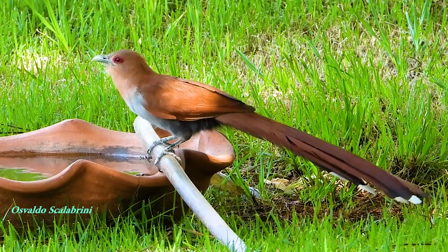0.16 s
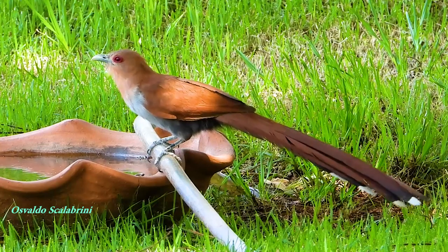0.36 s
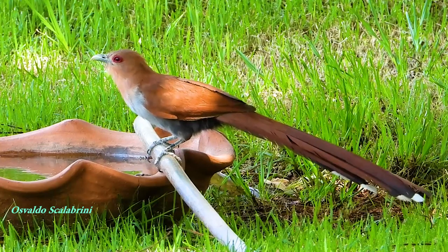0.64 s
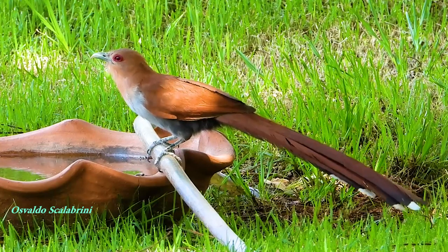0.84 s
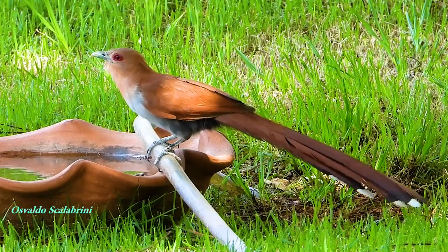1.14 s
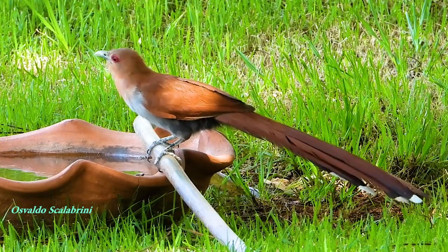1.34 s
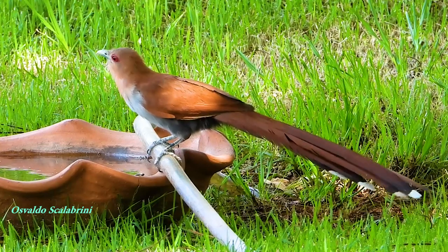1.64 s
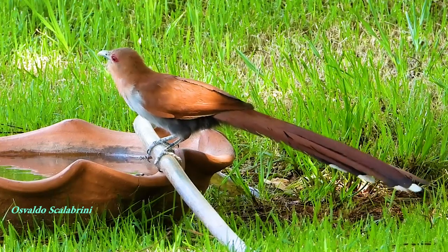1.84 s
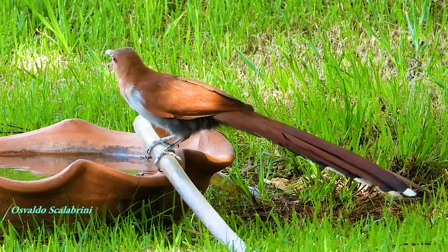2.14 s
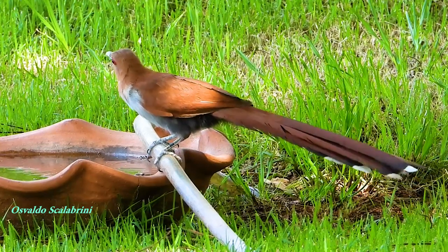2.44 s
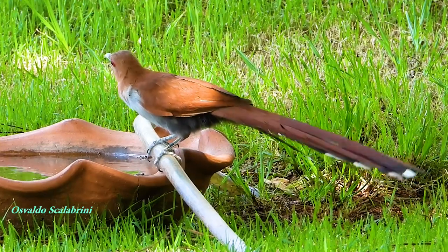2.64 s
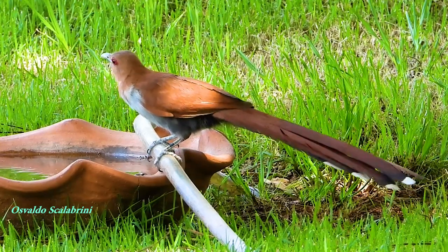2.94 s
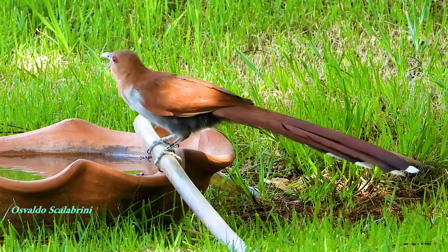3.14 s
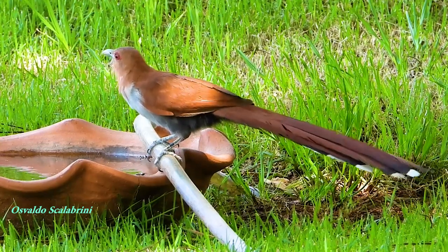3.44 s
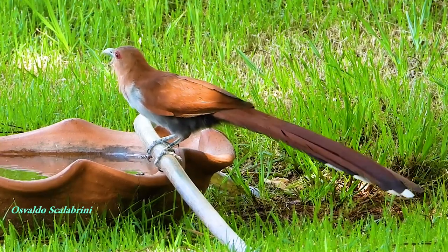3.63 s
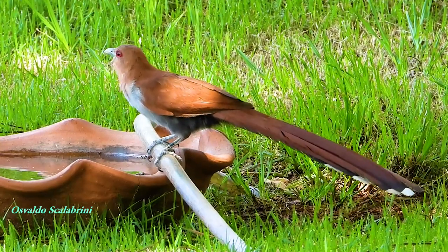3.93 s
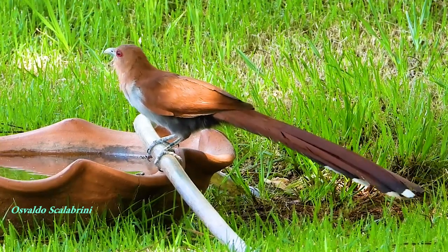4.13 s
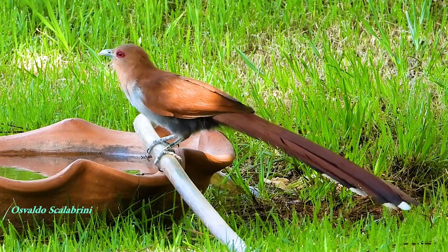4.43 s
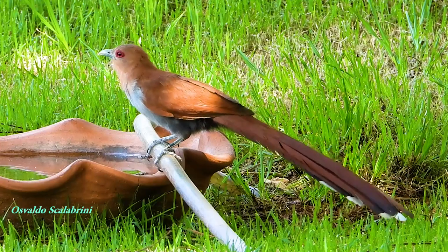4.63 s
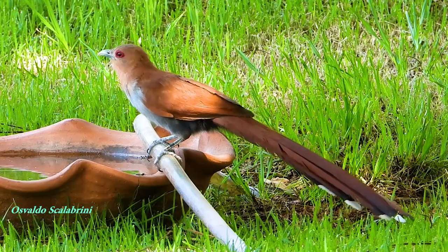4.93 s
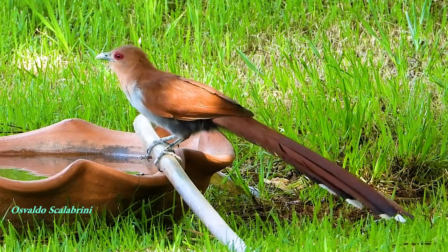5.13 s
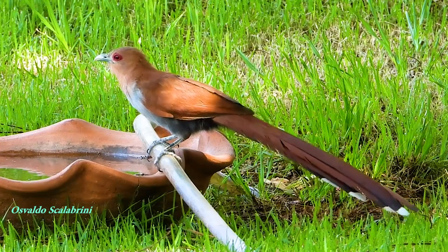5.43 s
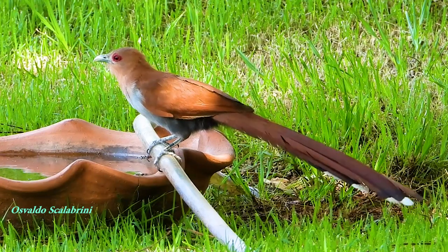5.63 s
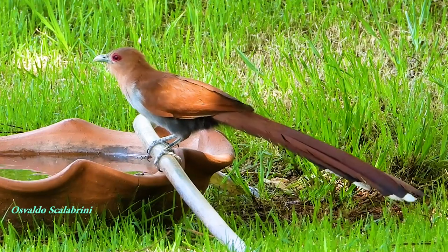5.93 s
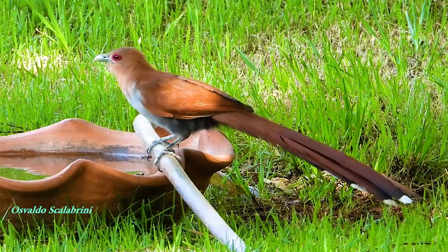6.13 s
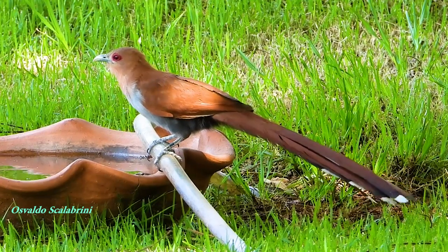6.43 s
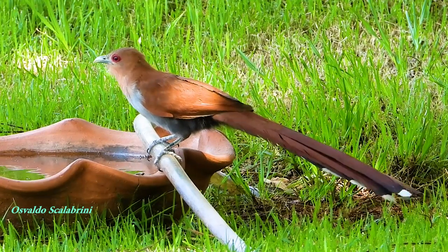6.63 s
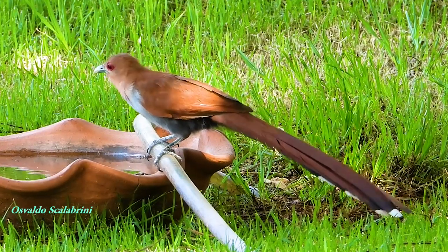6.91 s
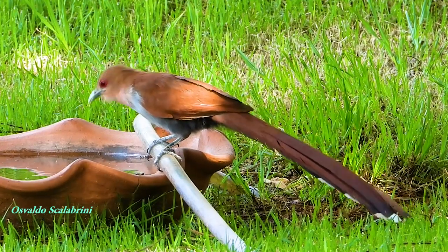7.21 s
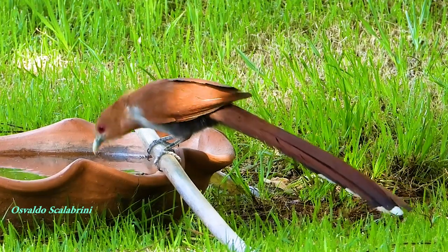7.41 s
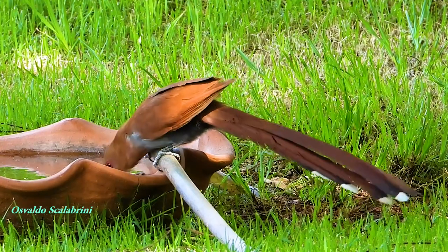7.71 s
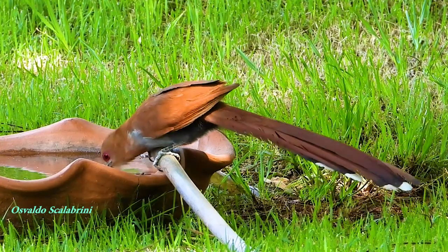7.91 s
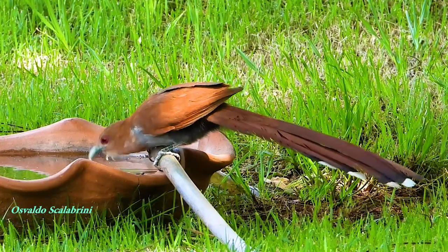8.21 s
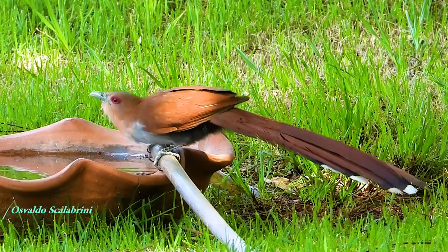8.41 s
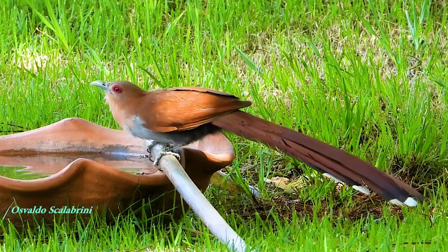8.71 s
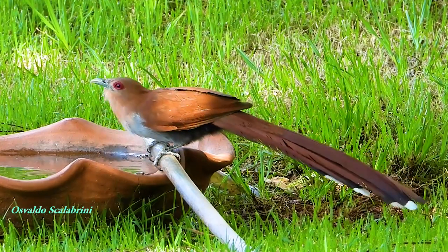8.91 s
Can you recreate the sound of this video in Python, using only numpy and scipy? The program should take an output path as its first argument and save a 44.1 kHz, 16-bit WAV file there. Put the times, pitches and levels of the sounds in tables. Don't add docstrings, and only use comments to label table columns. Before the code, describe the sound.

Garden birds call in short, bright whistled phrases, with chips, chatter, a trill and harsh churrs over faint insect ringing and a thin high whine.

```python
import sys
import numpy as np
from scipy import signal
from scipy.io import wavfile
from scipy.ndimage import uniform_filter1d

SR = 44100
rng = np.random.default_rng(int(sys.argv[2]) if len(sys.argv) > 2 else 0)


def generate_wav(sig):
    pcm = np.round(np.clip(np.atleast_2d(sig).T, -1, 1) * 32767).astype(np.int16)
    wavfile.write(sys.argv[1], SR, pcm)


def boost_factor(decibels):
    exponent = np.asarray(decibels, float) / 20
    return 10 ** exponent


N = 399546
T = np.arange(N) / SR


def evened(x):
    return x / np.sqrt(np.mean(x ** 2) + 1e-20)


def smooth_noise(count, size):
    return uniform_filter1d(rng.standard_normal(count), size=size)


def high_pass(x, order, cutoff_hz):
    return signal.sosfilt(signal.butter(order, cutoff_hz, "high", fs=SR, output="sos"), x)


def read(points, hz):
    f, value = np.transpose(points)
    return np.interp(np.log(hz + 1), np.log(f + 1), value)


def add(mix, s, sound):
    at = round(s * SR)
    part = mix[max(at, 0):max(at + len(sound), 0)]
    part += sound[max(-at, 0):][:len(part)]


# (f/Hz, level/dB)
FLAT = [(1000, 0), (16000, 0)]


def sing(hz, db, overtones_db, edge, beak=FLAT, rough=0):
    count = len(hz)
    hz = hz * (1 + 0.024 * smooth_noise(count, 60))
    phase = 2 * np.pi * np.cumsum(hz) / SR
    wave = np.sin(phase) * (1 + 0.085 * rough * evened(smooth_noise(count, 90)))
    for k, over_db in enumerate(overtones_db, start=2):
        flutter = 1 + rough * evened(smooth_noise(count, 36))
        passed = boost_factor(over_db + read(beak, k * hz) - read(beak, hz))
        passed = passed * (k * hz < SR / 2)
        wave = wave + passed * flutter * np.sin(k * phase)
    return np.sqrt(2) * boost_factor(db) * wave * signal.windows.tukey(count, np.clip(edge, 0, 1))


def glide(mix, rows, overtones_db, edge=0.11, beak=FLAT, size=180):
    s, hz, db = np.transpose(rows)
    t = np.arange(s[0], s[-1], 1 / SR)
    hz = uniform_filter1d(np.interp(t, s, hz), size=size, mode="nearest")
    db = uniform_filter1d(np.interp(t, s, db), size=size, mode="nearest")
    add(mix, s[0], sing(hz, db, overtones_db, edge, beak, rough=0.3))


def chirps(rows, bend, fade_db, overtones_db, edge, rough, beak=FLAT):
    mix = np.zeros(N)
    for s, length, start_hz, end_hz, db in rows:
        u = np.linspace(0, 1, int(length * SR))
        hz = start_hz + (end_hz - start_hz) * u ** bend
        add(mix, s, sing(hz, db + fade_db * u, overtones_db, edge, beak, rough))
    return mix


# (f/Hz, left-right likeness/1)
SAME = [(100, 0.69), (700, 0.14), (1500, 0.11), (4000, 0.49), (8000, 0.94)]


def noise(spectrum, patchy_db):
    frames, hz = N // 128 + 5, np.fft.rfftfreq(512, 1 / SR)
    a, b, c, d, patches = rng.standard_normal((frames, 257, 5)).T
    patches = uniform_filter1d(patches, size=6, axis=0)
    patches = evened(uniform_filter1d(patches, size=20, axis=1))
    same = np.clip(read(SAME, hz), -1, 1)[:, None]
    left = a + 1j * b
    right = same * left + np.sqrt(1 - same ** 2) * (c + 1j * d)
    z = np.array([left, right]) * boost_factor(read(spectrum, hz)[:, None] + patchy_db * patches)
    return evened(signal.istft(z, nperseg=512, noverlap=384)[1][:, :N])


# (f/Hz, t60/s)
TREES = [(1000, 0.26), (2200, .5), (3000, 0.49), (4500, 0.47), (7000, 0.45), (12000, 0.31)]


def placed(x, pan_db, echoes, wet_db, gap_s, apart=0.37, low_hz=1100):
    taps = np.zeros((3, SR))
    at = np.arange(0, SR, 20) + rng.integers(0, 20, (3, SR // 20))
    np.put_along_axis(taps, at, rng.choice([-1., 1.], at.shape), 1)
    taps = taps[0] + apart * taps[1:]
    _, t, z = signal.stft(taps, SR, nperseg=256)
    t60 = np.maximum(read(TREES, np.fft.rfftfreq(256, 1 / SR)), .05)
    tail = signal.istft(z * boost_factor(-60 * t / t60[:, None]), SR, nperseg=256)[1]
    tail *= 1 - np.exp(-np.arange(tail.shape[1]) / (0.58 * gap_s * SR))
    tail = boost_factor(wet_db) * tail / np.linalg.norm(tail[0])
    path = np.pad(tail, ((0, 0), (int(gap_s * SR) + 1, 0)))
    path[:, 0] = 1
    for s, db in echoes:
        path[:, int(s * SR)] += boost_factor(db)
    x = high_pass(x, 4, low_hz)
    heard = signal.fftconvolve(x[None], path, axes=1)[:, :N]
    return heard * boost_factor(np.array([[pan_db], [-pan_db]]) / 2)


# (f/Hz, level/dB)
AIR = [(35, -72), (60, -35.5), (553, -33), (1410, -10), (2770, -6.5), (3190, -2), (3510, -8), (5590, -10),
       (6290, -11), (6750, -9.5), (7410, -12.5), (14300, -15.5), (16000, -8)]


def air():
    return boost_factor(-69.5) * noise(AIR, 1.0)


def whine():
    return boost_factor(-78.5) * np.sin(2 * np.pi * 15734 * T)


def from_perch(x):
    return placed(x, -1.8, [(.013, -18), (.045, -27.5)], -16, 0.003, apart=1.0)


# (top t/s, start f/Hz, top f/Hz, level/dB, f/Hz at which the ground echo cancels)
RISES = [
    (.018, 2412, 2871, -38, 2834),
    (.318, 2380, 2897, -38, 2672),
    (.607, 2364, 3000, -37, 2870),
    (.908, 2350, 2955, -37.5, 2863),
    (2.6, 2570, 3055, -34.5, 2900),
    (2.91, 2435, 3017, -33, 2874),
    (3.181, 2346, 2933, -35.5, 2844),
    (3.465, 2126, 3099, -32, 2807),
    (3.776, 2150, 3126, -32.5, 2870),
    (4.066, 2150, 3050, -33, 2760),
]
# (dip t/s, dip f/Hz, arch f/Hz, arch level/dB, arch length t/s)
HOOKS = [
    (0.043, 1620, 2308, -42.5, .068),
    (.35, 1600, 2317, -41.5, 0.069),
    (0.633, 1694, 2386, -42, 0.07),
    (.941, 1650, 2276, -42.5, 0.077),
    (2.634, 1750, 2436, -37.5, 0.069),
    (2.935, 1682, 2400, -38.5, 0.075),
    (3.21, 1600, 2350, -37.5, 0.072),
    (3.494, 1878, 2505, -36, 0.076),
    (3.804, 1822, 2385, -39.5, 0.072),
    (4.099, 1982, 2392, -40, 0.069),
]
# (f/Hz, level/dB)
BEAK = [(1500, -30), (2000, -16), (2400, 2.5), (3000, -6), (3700, 3), (4800, -9), (6000, -1), (9000, -0.5),
        (14000, -0.5)]
RISE_S = .058
MIDWAY_DB, MIDWAY_DB_PER_KHZ = 13.5, -20.5
DIP_DB, DIP_DB_PER_KHZ = -67, 38.5


def whistles():
    mix = np.zeros(N)
    for rise, hook in zip(RISES, HOOKS):
        s, start_hz, top_hz, top_db, null_hz = rise
        dip, dip_hz, arch_hz, arch_db, arch_s = hook
        end = dip + arch_s
        mid_db = top_db + MIDWAY_DB + MIDWAY_DB_PER_KHZ * (top_hz - start_hz) / 1000
        dip_db = DIP_DB + DIP_DB_PER_KHZ * (dip_hz - 1700) / 1000
        rows = [(s - RISE_S, start_hz, mid_db - 20.5),
                (s - .76 * RISE_S, .18 * start_hz + .71 * top_hz, mid_db - 9),
                (s - 0.48 * RISE_S, .12 * start_hz + .82 * top_hz, mid_db),
                (s, top_hz, top_db),
                (s + 0.0055, .96 * top_hz, top_db + 3.0),
                (s + .017, 1.12 * dip_hz, dip_db + 11.5),
                (dip, dip_hz, dip_db),
                (dip + 0.009, 1.1 * dip_hz, dip_db + 11.5),
                (dip + .018, .95 * arch_hz, arch_db - 3),
                (dip + .52 * arch_s, 1.01 * arch_hz, arch_db),
                (end - .013, .97 * arch_hz, arch_db - 6.5),
                (end, 0.83 * arch_hz, arch_db - 18.5)]
        call = np.zeros(N)
        rows = np.add(rows, [.1, 0, -3])
        glide(call, rows, [-31, -35.5, -39.0, -42.5, -39.5], edge=0.02, beak=BEAK)
        ground_delay = round(SR * 13.5 / null_hz)
        add(mix, -.1, call + boost_factor(-1.5) * np.roll(call, ground_delay))
    return from_perch(mix)


# (t/s, lead over a steady beat/pulses, level/dB)
CRICKET = [(0, -.42, -66.5), (.9, -.45, -70), (1.8, -.17, -67), (2.2, -.22, -74), (2.45, -.8, -70.5),
           (3.3, -.67, -67.5), (4.5, -.78, -67), (5.2, -.87, -71.5), (5.33, -1.7, -72),
           (5.45, -1.56, -69.5), (5.8, -1.22, -70.5), (6.72, -1.2, -67), (7.15, -.85, -68),
           (7.7, -.75, -68), (8.6, -.68, -68), (9.1, -.73, -69.5)]
# (from t/s, to t/s)
RESTS = [
    (2.3, 2.375),
    (5.215, 5.32),
    (6.73, 6.895),
]
BEAT_HZ, REST_DB = 22.1, -15


def cricket():
    s, lead, db = np.transpose(CRICKET)
    beat = BEAT_HZ * T + np.interp(T, s, lead)
    u = ((beat + .5) % 1 - .5) / 0.46
    stroke = np.sqrt(np.clip(2.7 * (.5 - abs(u)), 0, 1))
    wander_hz = 14 * evened(smooth_noise(N, 1500))
    hz = 3290 + wander_hz - 70 * np.clip(u, -.5, .5)
    tone = sing(hz, np.interp(T, s, db) - 0.5, [], 0) * stroke
    tone *= boost_factor(REST_DB * sum((T > a) & (T < b) for a, b in RESTS))
    far = sing(6900 + wander_hz, -90.5, [], 0) * stroke[::-1]
    return placed(tone, 8, [], -14, .01) + far


# (start t/s, length t/s, level/dB)
TWITTERS = [
    (0.025, 0.11, -74),
    (0.481, 0.13, -84),
    (0.841, 0.1, -73),
    (3.098, 0.11, -72.5),
    (4.073, 0.11, -73.5),
    (4.867, 0.071, -73.5),
    (7.221, 0.12, -75),
    (8.57, 0.11, -75),
]


def twitter():
    mix = np.zeros(N)
    for s, length, db in TWITTERS:
        u = np.arange(int(length * SR)) / SR / .058 % 1
        falling = sing(5760 - 180 * u, db, [], 0.1)
        dipping = sing(5300 + 260 * (2 * u - 1) ** 2, db, [], 0.31)
        add(mix, s, falling + dipping)
    flutter = 1 + 0.49 * evened(smooth_noise(N, 150))
    return placed(mix * flutter, -0.83, [], -7.5, 0.0027)


def from_twig(x):
    return placed(x, -0.22, [(.0035, -8.5), (.009, -11)], -17.5, 0.0081)


# (lowest point t/s, f/Hz, level/dB)
CHIPS = [
    (.66, 5505, -44),
    (4.952, 5526, -42),
    (8.012, 5340, -49),
]
# (t/s, pitch ratio/1, level/dB)
CHIP_SHAPE = [
    (-.009, 1.2, -20),
    (0, 1, -0.5),
    (.0085, 1.06, -4.5),
    (.0165, 1.1, -18.5),
]


def chips():
    mix = np.zeros(N)
    for s, hz, db in CHIPS:
        glide(mix, np.multiply(CHIP_SHAPE, [1, hz, 1]) + [s, 0, db], [-24], size=90)
    return from_twig(mix)


# (t/s, length t/s, start f/Hz, end f/Hz, level/dB)
SONG = [(1.154, .018, 4290, 3660, -71), (1.2, 0.032, 4700, 5400, -75.5), (1.401, 0.025, 4700, 5400, -67),
        (1.468, 0.03, 4350, 2750, -56.5), (1.497, 0.057, 2794, 4560, -57), (1.552, 0.018, 4450, 3480, -56),
        (1.568, 0.035, 3600, 2503, -60), (1.597, 0.017, 2550, 2790, -63.5), (1.682, .025, 5890, 6210, -60),
        (1.712, .011, 5180, 7200, -66), (1.72, 0.044, 7160, 6300, -61.5), (1.81, 0.052, 4750, 3180, -54),
        (1.995, 0.037, 4600, 4360, -68)]
# (t/s, length t/s, start f/Hz, end f/Hz, level/dB)
PLUNGES = [
    (1.243, 0.081, 4405, 2540, -63.5),
    (1.432, 0.034, 5560, 4190, -61),
    (1.612, .02, 2834, 2300, -64),
    (1.765, 0.046, 6370, 4570, -57),
    (1.911, 0.034, 5020, 4290, -59),
]
# (t/s, length t/s, start f/Hz, end f/Hz, level/dB)
ZIGZAGS = [(2.305, 0.016, 6730, 5880, -71), (2.409, 0.011, 5050, 3140, -69.5),
           (2.422, .013, 3365, 5580, -66.5), (2.435, .012, 5770, 3610, -66.5),
           (2.415, .013, 6730, 5840, -69.5), (4.205, .045, 4700, 3400, -73),
           (6.782, .012, 7303, 4100, -64.5), (6.831, .01, 4000, 5700, -65),
           (6.839, 0.0099, 5850, 5660, -54.5), (6.848, .015, 5600, 3300, -61),
           (7.565, 0.029, 4000, 4670, -74)]
# (f/Hz, level/dB)
FAR_BEAK = [(2500, 9), (5000, -4), (7000, -7.5), (8000, -6), (9500, 5.5), (11500, -8.5), (16000, -16)]
REPEAT_S, REPEAT_DB = 4.405, 2


def warbler():
    mix = np.zeros(N)
    for notes, bend, swell_db in (SONG, .95, .5), (PLUNGES, 1.8, 3):
        again = [(s + REPEAT_S, *shape, db + REPEAT_DB) for s, *shape, db in notes]
        mix += chirps(notes + again, bend, swell_db, [-18, -26], 0.28, 0.52, FAR_BEAK)
    thin = chirps(ZIGZAGS, 1.05, -.1, [-25], 0.16, .4)
    phrase = placed(mix, 3.8, [(.0025, -6.5)], -3.8, .028, apart=0.99)
    return phrase + placed(thin, 1.0, [(.003, -1.3)], -8.5, 0.0026)


# (t/s, level/dB)
CHATTER = [
    (2.046, -47.5),
    (2.09, -42.5),
    (2.139, -40.5),
    (2.185, -40.5),
    (2.231, -42),
    (2.279, -44),
]
CHATTER_S, CHATTER_HZ, CHATTER_END_HZ = .0115, 2750, 1750
SLACK_PER_DB = .014


def chatter():
    s, db = np.transpose(CHATTER)
    slack = SLACK_PER_DB * (db.max() - db)
    notes = zip(s, CHATTER_S * (1 - 4 * slack), CHATTER_HZ * (1 - slack), CHATTER_END_HZ + 0 * s, db)
    low = chirps(notes, 2.1, -8.0, [-27, -32, -36], 0.46, 0.76)
    rebounds = [(s + 0.0089, .016, 2450, 1850, db - 9) for s, db in CHATTER]
    low += chirps(rebounds, .7, -7.5, [-22, -30], 0.59, 1.6)
    return placed(low, -.7, [(.004, -2.5), (.025, -29.5)], -13.5, 0.011)


# (t/s, level/dB)
TRILL = [
    (4.36, -35),
    (4.381, -36),
    (4.406, -42.5),
    (4.432, -44.5),
    (4.463, -46),
    (4.501, -46),
    (4.543, -45),
    (4.591, -46.5),
    (4.642, -50),
]
# (f/Hz, level/dB)
THIN_BEAK = [(3500, 7), (5000, 2.5), (7500, -25.5), (10000, 8), (13000, 6), (16000, -5)]
TRILL_HZ, FIRST_END_HZ, LAST_END_HZ = 5620, 3300, 4700
FIRST_S, LAST_S, SETTLE_S = .009, .024, .065


def trill():
    s, db = np.transpose(TRILL)
    haste = np.exp((s[0] - s) / SETTLE_S)
    lengths = LAST_S + (FIRST_S - LAST_S) * haste
    ends_hz = LAST_END_HZ + (FIRST_END_HZ - LAST_END_HZ) * haste
    notes = list(zip(s, lengths, TRILL_HZ + 0 * s, ends_hz, db))
    bright = chirps(notes, .5, 0, [-5, -20], 0.62, 0.32, THIN_BEAK)
    for s, length, *_, db in notes:
        snap = np.diff(rng.standard_normal(129)) * np.hanning(128)
        add(bright, s + 0.71 * length, boost_factor(db - 15.5) * snap)
    return from_twig(bright)


# (t/s, peak level/dB, ring f/Hz)
TICKS = [(5.857, -60, 1913), (6.086, -38, 2400), (6.507, -64, 1290), (6.552, -64, 1330), (6.588, -62, 1440),
         (6.605, -58.5, 1474), (6.677, -58.5, 1810), (6.741, -63, 1600), (6.773, -56.5, 1670),
         (6.844, -56.5, 1054), (6.87, -52.5, 2100), (6.922, -52.5, 2920), (6.949, -55, 1660),
         (7.119, -46, 2830), (7.2, -52, 2780), (8.401, -51.5, 1765), (8.814, -58, 1560)]
# (t/s, level/dB)
RUSTLE = [
    (5.751, -99.5),
    (5.9, -78),
    (6.45, -79.5),
    (7.099, -65.5),
    (7.25, -85.5),
    (7.55, -76),
    (8.4, -79.5),
    (8.6, -103),
]


def twigs():
    ticks, t = np.zeros(N), np.arange(300) / SR
    for s, db, hz in TICKS:
        ring = np.sin(2 * np.pi * hz * t) + 0.78 * smooth_noise(len(t), 2)
        add(ticks, s, boost_factor(db - 60 * t / 0.008) * ring)
    leaves = noise([(300, -49), (700, -22), (1400, 5), (3000, 3), (8000, -13)], 2.4)
    snaps = (rng.random(N) < 150 / SR) * rng.exponential(1, N)
    crackle = signal.lfilter([1], [1, -np.exp(-1 / (.002 * SR))], snaps)
    leaves = high_pass(leaves * (.8 + .8 * crackle), 3, 800)
    s, db = np.transpose(RUSTLE)
    leaves = leaves * boost_factor(np.interp(T, s, db, -140, -140) + 2.0)
    return placed(ticks, 1.5, [], -14.0, 0.0035, low_hz=876) + leaves


UNEVEN_S, UNEVEN_DB = .001, 1.5
SNAP_UP, BREAK = .17, 2.4


def warble(mix, start, length, top_hz, top_db, peak, arch, lows_hz, throb_db, overtones_db, count):
    before_hz, after_hz, before_db, after_db, haste = arch
    u = np.arange(count + 1) / count
    late, strong = rng.standard_normal((count + 1, 2)).T
    t = np.arange(0, length, 1 / SR)
    throb_s = length * (u + haste * u * (1 - u)) + UNEVEN_S * late * (u > 0)
    beat = np.interp(t, throb_s, u * count)
    k, p = np.minimum(beat.astype(int), count - 1), beat % 1
    off = (u - peak) ** 2
    high = top_hz + off * np.where(u < peak, before_hz, after_hz)
    db = top_db + off * np.where(u < peak, before_db, after_db) + UNEVEN_DB * strong
    fall = 1 - abs((p - SNAP_UP) / (1 - SNAP_UP)) ** BREAK
    up = np.where(p < SNAP_UP, np.sqrt(p / SNAP_UP), fall)
    low = np.interp(t / length, [0, peak, 1], lows_hz)
    hz = uniform_filter1d(low + (high[k] - low) * up, size=60, mode="nearest")
    level_db = uniform_filter1d(db[k] + throb_db * (1 - up), size=60, mode="nearest")
    add(mix, start, sing(hz, level_db, overtones_db, .04, rough=0.86))


# (start t/s, length t/s, top f/Hz, top level/dB, share of the length at which effort peaks/1)
ROLL = (7, 0.1017, 3080, -34.5, .63)
# (start t/s, length t/s, top f/Hz, top level/dB, peak share/1)
CHURRS = [
    (7.408, 0.12, 3015, -34, 0.44),
    (7.764, .13, 2890, -36, .3),
    (8.1, .118, 2964, -36, .33),
]
# (before f/Hz, after f/Hz, before level/dB, after level/dB, haste/1)
ROLL_ARCH = (-2400, -5500, -62, -85, 0.1)
CHURR_ARCH = (-4300, -2800, -84.5, -85, .38)
# (at start f/Hz, at peak f/Hz, at end f/Hz)
ROLL_LOWS = (1600, 2350, 900)
CHURR_LOWS = (1950, 1750, 1550)
ROLL_THROB_DB, CHURR_THROB_DB = -17, -13


def churrs():
    mix = np.zeros(N)
    warble(mix, *ROLL, ROLL_ARCH, ROLL_LOWS, ROLL_THROB_DB, [-24.5, -34.5, -40.5, -43], count=11)
    for row in CHURRS:
        warble(mix, *row, CHURR_ARCH, CHURR_LOWS, CHURR_THROB_DB, [-26.0, -33.0, -30.5, -37.5], count=7)
    return from_perch(mix + boost_factor(-4.0) * np.roll(mix, int(0.0041 * SR)))


def scene():
    whistler = whistles() + churrs()
    other_birds = twitter() + chips() + warbler() + chatter() + trill()
    return air() + whine() + whistler + cricket() + other_birds + twigs()


def band_limit(x):
    return signal.sosfilt(signal.butter(12, 16170, fs=SR, output="sos"), x)


def record(dry):
    mix = high_pass(dry, 2, 400)
    return band_limit(mix)


dry = scene()
out = record(dry)
generate_wav(out)
```